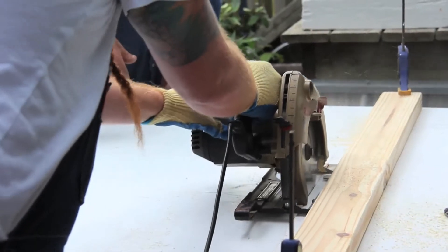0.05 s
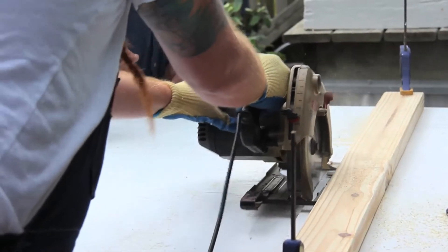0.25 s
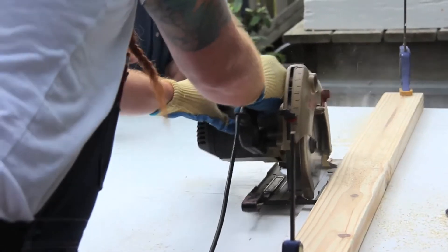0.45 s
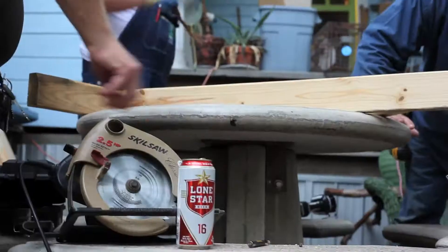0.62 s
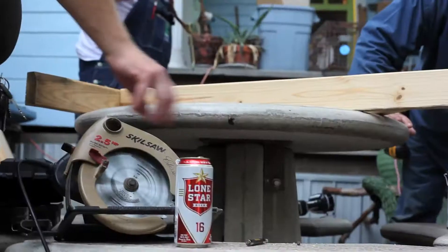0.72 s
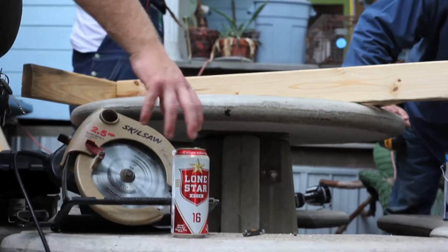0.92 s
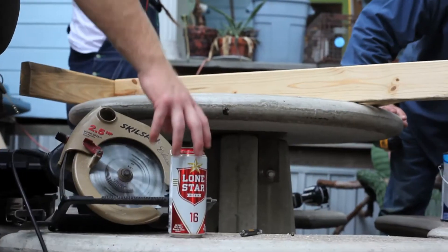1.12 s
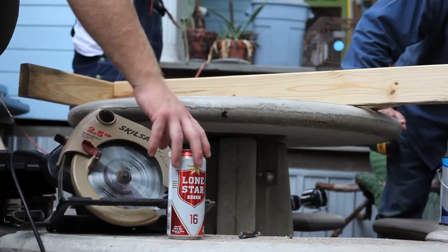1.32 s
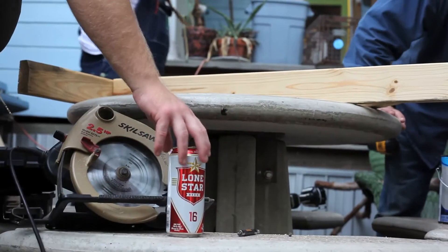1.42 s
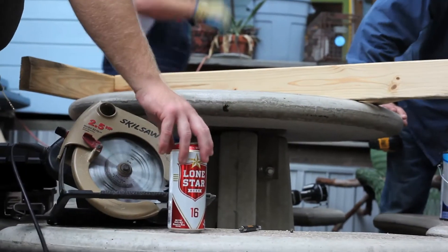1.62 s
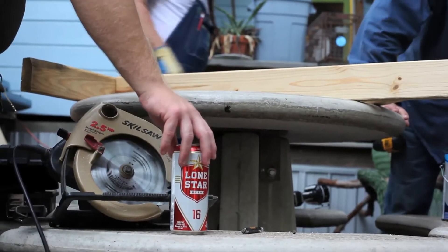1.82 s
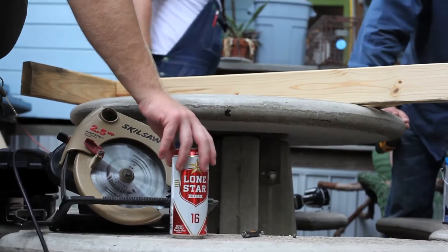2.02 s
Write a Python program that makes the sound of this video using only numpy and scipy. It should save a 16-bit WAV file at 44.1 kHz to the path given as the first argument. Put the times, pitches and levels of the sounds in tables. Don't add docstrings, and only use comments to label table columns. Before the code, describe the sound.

Loud circular saw cutting wood outdoors, its whine sinking before the freed blade rings and gears whir

```python
import sys
import numpy as np
from scipy import signal
from scipy.fft import rfft, irfft, next_fast_len
from scipy.io import wavfile
from scipy.ndimage import uniform_filter1d, map_coordinates

SR = 44100
rng = np.random.default_rng(int(sys.argv[2]) if len(sys.argv) > 2 else 0)


def dump_mix(stems):
    frames = np.atleast_2d(stems).T
    limited = np.clip(frames, -1, 1)
    pcm = np.round(limited * 32767).astype(np.int16)
    wavfile.write(sys.argv[1], SR, pcm)


def volts_from_decibels(level):
    exponent = np.asarray(level, float) / 20
    return 10 ** exponent


N = 90581
T = np.arange(N) / SR
CLEAR_S = .925

# f/Hz, level/dB per Hz
CHIP_COLOUR = [(88, -59), (150, -37.5), (985, -1.5), (1090, 0.5), (1940, -8), (2140, -6), (2810, -5),
               (6600, 0.5), (15500, -23)]


def unit(x):
    return x / np.sqrt(np.mean(x ** 2) + 1e-20)


def along(points, hz):
    f, v = np.transpose(points)
    return np.interp(np.log(hz + 1), np.log(f + 1), v)


def curves(rows):
    s, *cols = np.transpose(rows)
    return [uniform_filter1d(np.interp(T, s, c), size=900, mode="nearest") for c in cols]


def wobble(rate, t=T):
    return map_coordinates(rng.standard_normal(9000), [t * rate])


def bump(s, half_s):
    return np.exp(-.5 * ((T - s) / half_s) ** 2)


def filtered(x, response):
    m = next_fast_len(N + 8192)
    return irfft(rfft(x, m) * response(np.fft.rfftfreq(m, 1 / SR)), m)[:N]


def hiss(spectrum):
    return unit(filtered(rng.standard_normal(N), lambda hz: volts_from_decibels(along(spectrum, hz))))


def through(x, peaks):
    def response(f):
        total = 0
        for k, (centre, width, db) in enumerate(peaks):
            band = 1j * f * width
            total = total + (-1) ** k * volts_from_decibels(db) * band / (centre * centre - f * f + band)
        return total
    return filtered(x, response)


def patchy(x, depth_db):
    z = signal.stft(x, nperseg=256)[2]
    field = uniform_filter1d(rng.standard_normal(z.shape), size=5, axis=0)
    field = uniform_filter1d(field, size=6, axis=1)
    return unit(signal.istft(z * volts_from_decibels(depth_db * unit(field)), nperseg=256)[1][:N])


def whine(phase, levels_db, bog):
    out = np.zeros(N)
    fuzz = 0.15 * (1 + 7 * bog)
    for k, db in enumerate(levels_db, 1):
        start, lean = rng.uniform(0, 2 * np.pi, size=2)
        slow_blur = 0.19 * wobble(24.44)
        fast_blur = .03 * (1 + 4 * bog) * wobble(220)
        turn = k * (phase + slow_blur + fast_blur) + start
        line = (1 + fuzz * wobble(160)) * np.sin(turn) + fuzz * wobble(160) * np.cos(turn)
        sink_db = 12 * bog * (0.98 + 0.051 * k)
        flutter_db = (1 + 7 * bog) * wobble(48.26)
        throb = 1 + .05 * k * np.cos(phase / 24 + lean)
        out += volts_from_decibels(db - sink_db + flutter_db) * throb * line
    return out


def yard():
    # f/Hz, level/dB per Hz
    yard_colour = [(15, -30), (50, 4), (120, -8), (250, 23), (360, -17), (480, -7), (700, 30.5),
                   (1000, -18)]
    return volts_from_decibels(-53.5 + 0.31 * wobble(11.6)) * hiss(yard_colour)


def wind():
    # t/s, level/dB, half width/s
    puff_table = [
        (0.781, -43.5, 0.025),
        (1.09, -41, 0.027),
        (1.163, -38.5, 0.0074),
        (1.68, -48, 0.019),
        (1.28, -49, 0.0049),
        (1.91, -36, 0.013),
        (1.97, -33.5, 0.016),
        (2.045, -30.5, 0.014),
    ]
    # f/Hz, level/dB per Hz
    wind_colour = [(15, -41), (40, -15), (70, -2), (130, -10), (250, -22), (500, -72)]
    gusts = sum(volts_from_decibels(db) * bump(s, half_s) for s, db, half_s in puff_table)
    return gusts * hiss(wind_colour)


def walls(x):
    # f/Hz, time to fall 60 dB/s
    decay_table = [(300, .4), (2000, .3), (8000, .18)]
    hz, t, z = signal.stft(rng.standard_normal(SR // 2), SR, nperseg=256)
    fade = volts_from_decibels(-60 * t / along(decay_table, hz)[:, None])
    tail = signal.istft(z * fade, SR, nperseg=256)[1]
    return signal.fftconvolve(np.pad(x, (500, 0)), tail / np.linalg.norm(tail))[:N]


def motor_hum(bite_db):
    # f/Hz, level/dB per Hz
    hum_colour = [(30, -40), (70, -15), (140, -4), (225, -0.5), (320, 0.5), (500, -10.5), (800, -20)]
    return volts_from_decibels(-40.5 + bite_db - bite_db[0]) * hiss(hum_colour)


def mesh():
    # f/Hz, start/s, level/dB
    mesh_table = [
        (953, 1.8, -37),
        (5300, 1.77, -44),
        (900, .55, -31),
    ]
    out = np.zeros(N)
    for hz, s, db in mesh_table:
        gate = np.clip((T - s) / .04, 0, 1)
        if s <= CLEAR_S:
            gate = gate * np.clip((s + .12 - T) / .02, 0, 1)
        tone = np.sin(2 * np.pi * hz * T + .9 * wobble(30))
        out += volts_from_decibels(db + 3 * wobble(25)) * gate * tone
    return out


def squeaks():
    # t/s, f/Hz, half width/s, level/dB
    squeak_table = [(.39, 195, 0.036, -45), (.665, 230, 0.05, -44), (.78, 215, 0.015, -41),
                    (.855, 3300, 0.014, -26.5), (.885, 4150, .014, -28), (.89, 1230, 0.007, -28.5),
                    (.93, 1200, 0.015, -31), (.93, 3450, 0.014, -32.5), (.95, 12000, 0.024, -43.5),
                    (.95, 13100, 0.017, -51), (.95, 15100, .015, -51), (.995, 7800, 0.0052, -35.5),
                    (1.007, 1500, 0.0088, -34), (1.015, 1250, 0.016, -37), (1.02, 4150, 0.0043, -27),
                    (1.035, 1650, 0.011, -35), (1.13, 1615, 0.023, -39), (1.26, 1610, 0.035, -41),
                    (1.36, 1500, 0.059, -45), (1.415, 1885, .015, -38.5), (1.47, 2650, 0.013, -39),
                    (1.514, 4230, 0.0019, -27.5), (1.514, 5000, .002, -35), (1.512, 3730, 0.0018, -30),
                    (.885, 700, 0.01, -41), (1.96, 3870, 0.0035, -32), (.822, 2055, 0.0055, -24.5),
                    (1.88, 5820, .012, -41), (1.69, 2600, 0.011, -36.5), (1.727, 8500, 0.0035, -47),
                    (1.734, 5950, 0.0074, -34), (1.755, 3300, .008, -40), (1.795, 5300, 0.012, -35),
                    (1.827, 6000, 0.0034, -28), (1.826, 3300, 0.0062, -36), (1.874, 6200, 0.005, -35),
                    (1.921, 5950, 0.0073, -30.5), (1.968, 5950, 0.0063, -33), (1.971, 3200, .007, -29),
                    (2.001, 8200, 0.0033, -35), (2.017, 5900, 0.007, -27), (2.03, 5300, 0.023, -36),
                    (2.047, 6000, 0.0044, -29.5)]
    out = np.zeros(N)
    for s, hz, half_s, db in squeak_table:
        near = np.abs(T - s) < 4 * half_s
        t = T[near]
        rate = min(.15 * hz, 2.8 / half_s)
        swell = volts_from_decibels(db + 2 + 2.4 * wobble(rate, t)) * bump(s, half_s)[near]
        out[near] += swell * np.sin(2 * np.pi * hz * t + .8 * wobble(rate, t))
    return out


def gear_shake():
    # t/s, level/dB
    near_table = [(.9, -32), (1.1, -36), (1.28, -36), (1.45, -34.5), (1.64, -32.5), (1.67, -37), (1.7, -32),
                  (1.8, -31.5), (2.05, -31.5)]
    # t/s, peak level/dB
    rattle_table = [(1.002, -14), (1.215, -27), (1.255, -22), (1.295, -24), (1.4594, -25), (1.513, -21),
                    (1.561, -15.5), (1.6294, -16), (1.687, -13.5), (1.7186, -22), (1.729, -12.5),
                    (1.751, -17), (1.7794, -16), (1.822, -20), (1.868, -5.5), (1.9145, -10.5),
                    (1.959, -3.5), (1.997, -9), (2.009, -7), (2.038, -4)]
    near_db, = curves(near_table)
    shake = volts_from_decibels(near_db - 1.5 + 0.77 * wobble(24.75)) * np.clip((T - .85) / 0.057, 0, 1)
    for s, db in rattle_table:
        t = np.clip(T - s, 0, None)
        rise = 1 - np.exp(-t / 0.0067)
        shake = shake + volts_from_decibels(db - 15.5 - 60 * t / 0.079) * rise
    return shake


def coasting():
    # f/Hz, level/dB per Hz
    gear_colour = [(180, -16), (300, -12.5), (562, -14), (937, -5.5), (1180, -4), (3280, -5.5),
                   (4720, -11.5), (5950, -8), (15500, -42)]
    # f/Hz, width/Hz, level/dB
    housing_peaks = [(812, 170, 4), (2860, 160, -11), (3270, 90, 5.5), (3523, 51, 7), (4010, 300, 1.5),
                     (5190, 150, 1.5), (5970, 103, 8), (6530, 46, 6.5), (8200, 990, 4)]
    shake = gear_shake()
    grit = volts_from_decibels(2.6 * wobble(300))
    housing = patchy(through(hiss(gear_colour), housing_peaks), depth_db=2.5)
    whir = patchy(hiss(gear_colour) * grit, depth_db=0.75)
    return 0.82 * shake * whir + volts_from_decibels(-3.5) * shake * housing + squeaks() + mesh()


def blade():
    # f/Hz, level/dB, time to fall 60 dB/s, beat/Hz, rise/s, first beat crest/s
    mode_table = [(1714, -30, 0.46, 6.6, 0.01, 0.035), (1884, -51, 9, 2, 0.22, 0.41),
                  (2268, -43.5, 3.3, 0.64, 0.014, 0.24), (2437, -39, 1.6, 3, .02, 0.1),
                  (3303, -47.5, 15, 3.8, 0.064, 0.33), (4000, -47.5, 3, 2.9, .06, 0.14),
                  (4242, -39.5, 1.97, 2.1, 0.037, 0.27), (4992, -41.5, 4.7, 0.63, 0.093, 0.31),
                  (5270, -42, 1.55, 4.3, 0.022, 0.11), (6000, -39, .9, 5.9, 0.012, 0.059),
                  (6160, -34, 0.3, 5.5, 0.0089, 0.034), (4850, -41.5, 0.43, 6, 0.012, 0.037)]
    t = np.clip(T - .922, 0, None)
    ring = np.zeros(N)
    for hz, db, t60, beat_hz, rise_s, crest_s in mode_table:
        decay = volts_from_decibels(db - 60 * t / t60 + 1.3 * wobble(18))
        beat = 1 + .7 * np.cos(2 * np.pi * beat_hz * (t - crest_s))
        rise = 1 - np.exp(-t / rise_s)
        ring += decay * beat * rise * np.sin(2 * np.pi * hz * t + 0.84 * wobble(10.13))
    return np.sqrt(2) * volts_from_decibels(4.5) * ring


def scrape(engaged):
    colour = [(3000, -11), (6500, 3.0), (8500, 2), (12000, -10), (16000, -16)]  # f/Hz, level/dB per Hz
    rub = patchy(hiss(colour), depth_db=4.0)
    return volts_from_decibels(-25) * bump(0.939, 0.043) * rub * (0.31 + 0.81 * engaged)


def torn_wood(phase):
    # f/Hz, width/Hz, level/dB
    guard_peaks = [(2190, 450, 3), (3420, 240, 5.5), (4310, 290, 5), (6460, 590, -4.5), (7670, 960, 4.5),
                   (8430, 600, 6.5), (10900, 2800, 0.5)]
    tearing = volts_from_decibels(wobble(15.5) + 1.3 * wobble(118.5)) * (1 + .2 * np.cos(phase))
    chips = hiss(CHIP_COLOUR) * tearing
    treble = filtered(chips, lambda hz: 1 / (1 + (8000 / (hz + 1)) ** 6))
    chips = chips + (volts_from_decibels(.8 * wobble(8.8)) - 1) * treble
    guard = patchy(through(hiss(CHIP_COLOUR) * tearing, guard_peaks), 2.5)
    return volts_from_decibels(-11) * chips + volts_from_decibels(-9) * guard


def fan(phase, bog):
    fan_levels = [-33, -10, -29, -17, -36, -31, -34, -22]
    swell = bump(0.52, 0.097) + volts_from_decibels(-1) * bump(0.767, 0.047)
    return swell * whine(1.11 * phase, fan_levels, bog)


def tooth_whine(phase, bog):
    overtone_levels = [-16, -14, -14.5, -12, -13.5, -11, -11.5, -13, -21, -33, -23.5, -30, -33, -33]
    # t/s, multiple, half width/s, gain/dB
    swell_table = [(0.17, 1, 0.06, 10.5), (0.46, 1, 0.076, 11), (0.746, 1, 0.045, 7.5),
                   (0.837, 1, 0.031, 11), (0.18, 2, 0.07, 10), (0.32, 2, 0.0022, 13.5),
                   (0.468, 2, 0.055, 9), (0.563, 2, 0.018, 11), (0.649, 2, 0.04, 12),
                   (0.755, 2, 0.0041, 10), (0.835, 2, 0.046, 17), (0.024, 3, 0.023, 13.5),
                   (0.44, 3, 0.085, 6.5), (0.56, 3, 0.032, 8), (0.84, 3, 0.0088, 15.5),
                   (0.049, 4, 0.036, 12.5), (0.17, 4, 0.03, 10.5), (0.48, 4, 0.061, 14),
                   (0.659, 4, 0.033, 12), (0.636, 5, 0.025, 10.5), (0.54, 5, 0.037, 5.5),
                   (0.0056, 6, 0.022, 7.5), (0.27, 6, 0.017, 6.5), (0.47, 6, 0.012, 6),
                   (0.658, 6, 0.018, 8.5), (0.768, 4, 0.03, 9.5), (0.346, 1, 0.024, -4),
                   (0.39, 2, 0.002, 12), (.698, 2, 0.0034, 11), (.27, 4, 0.029, -5), (1, 8, 0.014, 7),
                   (0.737, 6, .015, 9), (0.74, 5, .02, 5)]
    levels = []
    for k, db in enumerate(overtone_levels, 1):
        gain_db = sum(g * bump(s, half_s) for s, m, half_s, g in swell_table if round(m) == k)
        levels.append(db + gain_db)
    levels[0] = levels[0] - 25 / (1 + np.exp((.848 - T) / 0.014))
    return whine(phase, levels, bog)


def cutting():
    # t/s, tooth rate/Hz, bite level/dB
    tooth_table = [(0, 1104, -9), (.07, 1089, -9.5), (.12, 1088, -11.5), (.26, 1086, -13.5),
                   (.33, 1077, -10), (.43, 1084, -12), (.51, 1082, -16), (.6, 1011, -17.5),
                   (.668, 1002, -14.5), (.72, 917.7, -15.5), (.77, 832.5, -17.5), (.826, 689.5, -18.5),
                   (.87, 635.4, -20), (.96, 583, -26)]
    rate_hz, bite_db = curves(tooth_table)
    phase = 2 * np.pi * np.cumsum(rate_hz) / SR
    bog = 1 - rate_hz / rate_hz[0]
    engaged = 1 / (1 + np.exp((T - CLEAR_S) / (.016 / 2)))
    saw = tooth_whine(phase, bog) + fan(phase, bog) + volts_from_decibels(12 * bog / 2) * torn_wood(phase)
    return volts_from_decibels(bite_db) * engaged * saw + scrape(engaged) + motor_hum(bite_db)


def scene():
    saw = cutting() + coasting()
    echo = volts_from_decibels(-13) * walls(saw)
    return (saw + echo + blade() + yard() + wind())[None]


def roll_off(x):
    return signal.sosfilt(signal.butter(12, 15650, fs=SR, output="sos"), x)


def record(dry):
    limit = .62
    mix = dry / (1 + np.abs(dry / limit) ** 4) ** (1 / 4)
    return roll_off(mix)


dry = scene()
out = record(dry)
dump_mix(out)
```